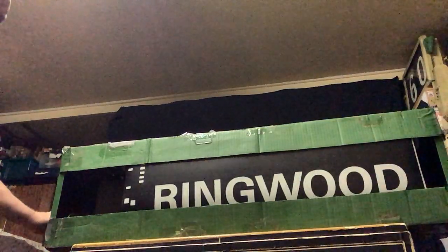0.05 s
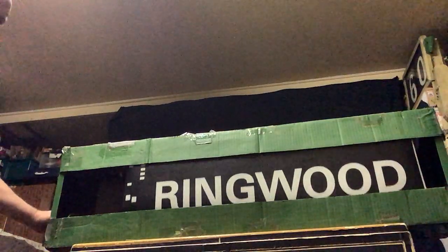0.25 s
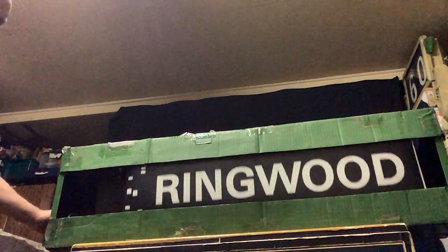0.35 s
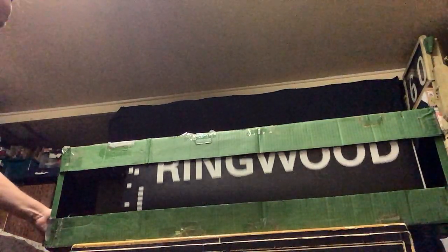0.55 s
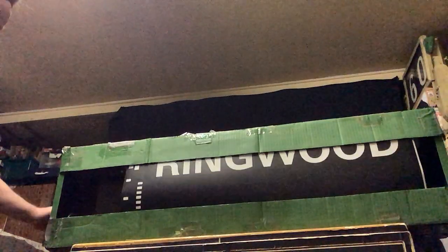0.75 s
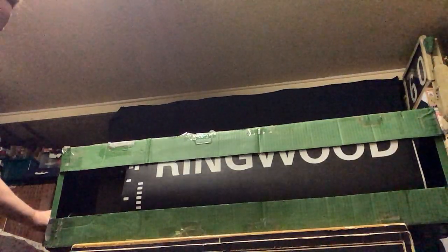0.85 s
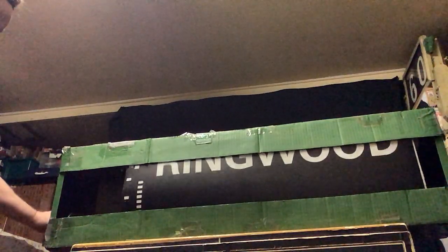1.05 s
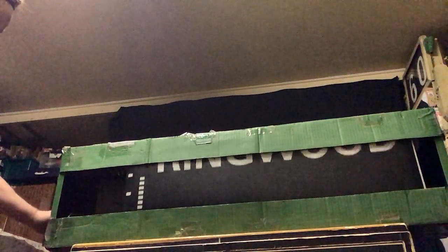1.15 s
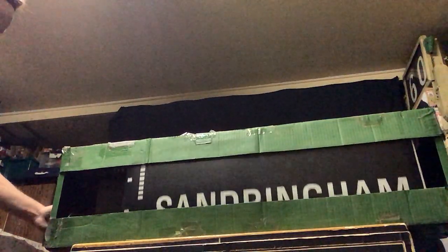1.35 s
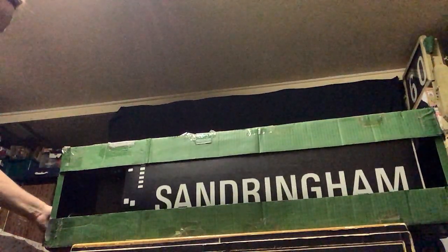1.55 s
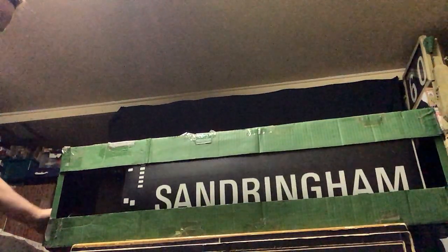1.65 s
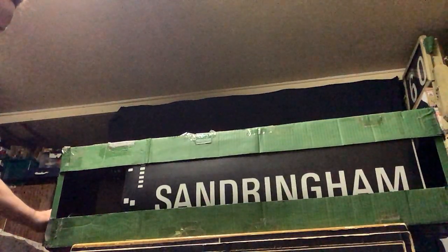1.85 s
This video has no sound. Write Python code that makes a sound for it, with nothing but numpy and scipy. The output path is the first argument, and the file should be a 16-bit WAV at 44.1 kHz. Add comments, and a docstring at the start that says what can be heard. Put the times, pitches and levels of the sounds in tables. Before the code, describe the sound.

A hand-wound roller blind ratchets in two short strokes, with cloth swishing and light knocks.

```python
"""A hand cranks a cloth roller blind in two strokes, in a wooden case in a small quiet room.
First the crank knocks the case lightly and the loose shaft taps. Then the rollers rumble, the cloth
swishes over them, and a pawl (a small catch) clicks over eight teeth of a ratchet wheel. The crank
stops with a knock and a faint metal clink. After a short pause it knocks again, and a second stroke
brings another swish and seven clicks. A last few knocks die away into the room's soft hum of air."""
import sys
import numpy as np
from scipy import signal
from scipy.fft import rfft, irfft
from scipy.io import wavfile

SR = 44100
rng = np.random.default_rng(int(sys.argv[2]) if len(sys.argv) > 2 else 0)


def generate_wav(sig):
    """Save sig (samples, or channels by samples) to the path in sys.argv[1] as 16-bit PCM at SR."""
    pcm = np.round(np.clip(np.atleast_2d(sig).T, -1, 1) * 32767).astype(np.int16)
    wavfile.write(sys.argv[1], SR, pcm)


N = 83790  # length in samples: 1.9 s

# Levels are relative. "Fade" is the time a sound takes to drop by 60 dB.
# Clicks of the pawl: t/s, level/dB, brightness/(dB per octave), extra bite/dB
CLICKS = [(0.2163, -45, 0.5, 1.5), (0.2992, -37.5, 0, 3), (0.3553, -36, 0.5, 1.5), (.405, -35.5, .5, -3.5),
          (0.445, -32.5, -0.5, 5), (0.4818, -35.5, -0.5, 0), (.519, -34.5, -1, -9), (0.5612, -37, -2, 1),
          (1.1108, -41, -2, -1.5), (1.1751, -37, -1, 1), (1.2382, -38.5, -0.5, 1), (1.3015, -37, 1, -1.5),
          (1.3545, -34, 1, 1), (1.4092, -38.5, -0.5, -1.5), (1.478, -39.5, 1.5, -5.5)]
# Ringing tones of the pawl and wheel: f/Hz, level/dB, fade/s
PAWL_TONES = [(1490, -5, .09), (1694, -4, .11), (1790, -7, .12), (1894, -8, .13), (2272, -10, .14),
              (2870, -7, .11), (3052, -11, .13), (3930, -4, .05), (4060, -2, .06), (4568, -4, .08),
              (4710, -4, .08), (4890, -5, .06), (6011, -3, .07), (7563, -8, .07), (7962, -9, .07),
              (8450, -6, .05), (8680, -3, .055), (9930, -7, .06)]
# Noisy clack of the whole mechanism: f/Hz, level/dB
CLACK_SPECTRUM = [(150, -27), (700, -5.5), (1500, 5.5), (3300, -1), (4200, 5.5), (5200, 0.5), (7200, 1),
                  (8600, 5), (9400, -2.5), (11200, -1), (11800, -10.5), (16000, -14)]
# How long the clack lasts: f/Hz, fade/s
CLACK_FADES = [(500, 0.031), (1800, 0.084), (5000, 0.023), (15000, 0.091)]
# Speed of the cloth, given as the loudness of its swish: t/s, level/dB
CLOTH_SPEED = [(0, -77), (.13, -73), (.2, -54), (.245, -48.5), (.33, -46.5), (.42, -43), (.52, -42),
               (.59, -46), (.645, -50), (.7, -54), (.77, -78), (.98, -81.5), (1.03, -59), (1.1, -49.5),
               (1.2, -47.5), (1.33, -46.5), (1.43, -46.5), (1.52, -50), (1.565, -56), (1.61, -74),
               (1.7, -79)]
# Hiss of the rubbing cloth: f/Hz, level/dB
SWISH_SPECTRUM = [(100, -12), (300, -2.5), (800, -2.5), (1800, -0.5), (3500, 1), (5600, -4.5), (8300, -5),
                  (11000, -7.5), (15500, -8.5)]
# Knocks of the crank and roller on the case: t/s, level/dB, brightness/(dB per octave)
KNOCKS = [(0.0612, -56.5, 2), (0.0889, -48.5, 2.5), (0.6527, -38.5, 2.5), (.657, -39, -3.5),
          (0.671, -48, -8), (0.9231, -51, 2), (.9295, -48, 0), (.937, -50, -1.5), (.955, -50.5, -0.5),
          (0.9778, -65, 0), (1.593, -50.5, 3), (1.605, -45, 2.5), (1.63, -44.5, 1), (1.643, -53, -7),
          (1.686, -51.5, 0), (1.711, -57, 5.5), (1.831, -52.5, -1), (1.8365, -51, -1.5)]
# Thud of the wooden case: f/Hz, level/dB
CASE_SPECTRUM = [(40, -24), (100, -24), (190, -9), (300, 4), (500, 1.5), (800, -1.5), (1200, -8),
                 (1550, -7.5), (2000, -13.5), (2800, -14.5), (3600, -26), (4800, -28), (6500, -34),
                 (16000, -54)]
# How long the thud lasts: f/Hz, fade/s
CASE_FADES = [(100, 0.43), (300, 0.085), (1000, 0.11), (5000, 0.11)]
# Ringing tones of the wooden panels: f/Hz, level/dB, fade/s
PANEL_TONES = [(146, 12, 0.34), (264, -1, 0.4), (302.3, 7.5, 0.22), (380, -50, 0.34), (400, -26, 0.15),
               (509.2, -0.5, 0.29), (576, -14, 0.48), (672, -8.5, 0.43)]
# Taps of the loose shaft: t/s, level/dB, f/Hz, spread to each side as a share of f, fade/s
TAPS = [(0.0626, -61.5, 2370, 0.094, 0.077), (0.0883, -59.5, 4215, .2, 0.17),
        (0.6537, -48, 1520, 0.051, 0.015), (.655, -43, 471, 0.19, 0.056), (.6705, -43, 285.6, 0.18, 0.073),
        (0.9782, -52.5, 467, 0.13, 0.018), (1.6047, -47.5, 1560, .09, 0.019),
        (1.629, -57, 2730, 0.18, 0.044), (1.686, -53, 496, .15, 0.058), (1.8365, -53.5, 554, 0.19, 0.036)]
# Clinks of the metal crank: t/s, level/dB, brightness/(dB per octave)
CLINKS = [(.157, -72.5, 18), (.64, -54, -4), (0.654, -45, -9), (0.669, -52, -2), (0.926, -63, 15),
          (0.9388, -55.5, 11), (1.628, -64, -4)]
# Ringing tones of the crank: f/Hz, level/dB, fade/s
CRANK_TONES = [(4334, -8, .1), (5319, -7, .18), (5650, -3, .2), (6350, -8, .13), (7456, -4, .14),
               (9071, -8, .13), (9927, -1, .12), (11000, -7, .09), (13300, -12, .09)]
# Noisy part of a clink: f/Hz, level/dB
CLINK_SPECTRUM = [(2000, -17), (5000, -2), (11000, -12.5), (16000, -22)]
# Loudness of the turning rollers: t/s, level/dB
ROLLER_LEVELS = [(0, -72), (.08, -84), (.11, -56.5), (.3, -65.5), (.44, -60.5), (.55, -51), (.68, -54.5),
                 (.78, -74), (.9, -71), (1.0, -54), (1.12, -76.5), (1.3, -56.5), (1.39, -61.5), (1.45, -56),
                 (1.55, -57.5), (1.66, -61), (1.78, -66.5), (1.9, -76)]
# Rumble of the rollers: f/Hz, level/dB
RUMBLE_SPECTRUM = [(30, -40), (48, -14), (75, -4), (98, 2), (130, -5), (160, -4), (200, -9), (290, -5),
                   (500, -15), (1200, -35), (4000, -65)]
# Steady air noise in the room: f/Hz, level/dB
AIR_SPECTRUM = [(25, -33), (50, -4.5), (100, -7), (180, -18), (300, -0.5), (700, -6.5), (1500, -15),
                (3000, -34.5), (6000, -26), (16000, -28.5)]
# How long the room echoes: f/Hz, fade/s
ROOM_FADES = [(100, 0.18), (500, 0.27), (2000, 0.21), (6000, 0.22), (15000, 0.28)]


def ratchet():
    """The pawl drops off each tooth and rings the mechanism, with more bite when it lands squarely."""
    out = np.zeros(N)
    shared_clack = noisy_ring(CLACK_SPECTRUM, CLACK_FADES, hold_s=.0015)
    bite_hz, bite_width_hz = 4180, 2300
    bite_filter = signal.iirpeak(bite_hz, bite_hz / bite_width_hz, SR)
    for start, db, brightness, bite_db in CLICKS:
        tooth_clack = noisy_ring(CLACK_SPECTRUM, CLACK_FADES, hold_s=.0015)  # each tooth differs
        click = scale_hit(shared_clack + .8 * tooth_clack)
        click += gain(-4.5) * ring(PAWL_TONES, scatter_db=1)
        click += (gain(bite_db) - 1) * signal.lfilter(*bite_filter, click)
        add(out, start, gain(db) * brighten(click, brightness, low_hz=870, high_hz=7800))
    return in_room(out, echo_db=-5)


def cloth():
    """The weave rubs over the rollers in tiny catches, louder and brighter the faster it moves."""
    grains_per_s, grain_share = 3000, .25
    grains = scale_steady(rng.standard_normal(N) * (rng.random(N) < grains_per_s / SR))
    rub = np.sqrt(grain_share) * grains + np.sqrt(1 - grain_share) * rng.standard_normal(N)
    rub = scale_steady(colour(rub, SWISH_SPECTRUM))
    hz, t, slices = signal.stft(rub, SR, nperseg=256, noverlap=192)  # the spectrum moment by moment
    speed_db = curve(CLOTH_SPEED, t)
    full_speed_db, dulling = -38.5, .23  # dulling: dB per octave lost for each dB below full speed
    brightness = dulling * np.clip(speed_db - full_speed_db, -20, 0)
    octaves = np.log2(np.maximum(hz, 1500) / 3000)[:, None]
    slices *= gain(speed_db + brightness * octaves)
    swish = signal.istft(slices, SR, nperseg=256, noverlap=192)[1][:N]
    return in_room(gain(-1.5) * swish, echo_db=-13)


def wooden_case():
    """Dull knocks of the crank and roller set the wooden panels ringing."""
    out, t = np.zeros(N), np.arange(SR // 2) / SR
    contact_s = .00097
    soft_start = 1 - np.exp(-(t / contact_s) ** 2)
    for start, db, brightness in KNOCKS:
        knock = noisy_ring(CASE_SPECTRUM, CASE_FADES) + gain(-7) * ring(PANEL_TONES, scatter_db=1)
        knock = brighten(knock, brightness, low_hz=230, high_hz=2800)
        add(out, start, gain(db) * soft_start * knock)
    return in_room(out, echo_db=-8)


def shaft():
    """The loose shaft shifts in its bearings with short, pitched taps."""
    out = np.zeros(N)
    for start, db, hz, spread, fade_s in TAPS:
        tones = split_tones([(hz, 0, fade_s)], spread, count=13)
        add(out, start, gain(db) * ring(tones, scatter_db=2))
    return in_room(out, echo_db=-5)


def crank():
    """Loose metal parts clink as the crank starts and stops."""
    out = np.zeros(N)
    for start, db, brightness in CLINKS:
        clink = noisy_ring(CLINK_SPECTRUM, fades=[(8000, .12)])
        clink += ring(split_tones(CRANK_TONES, spread=.018, count=7), scatter_db=1.5)
        add(out, start, gain(db) * brighten(clink, brightness, low_hz=4300, high_hz=12500))
    return in_room(out, echo_db=-11.5)


def rollers():
    """The turning rollers rumble through the case."""
    rumble = scale_steady(colour(rng.standard_normal(N), RUMBLE_SPECTRUM))
    return gain(curve(ROLLER_LEVELS, np.arange(N) / SR)) * rumble


def in_room(x, echo_db):
    """The walls of the small room send a sound back as a short, blurred echo."""
    echo = np.zeros(SR // 2)
    add(echo, start_s=.005, sound=noisy_ring([(20, 0), (SR / 2, 0)], ROOM_FADES))
    return x + gain(echo_db) * signal.fftconvolve(x, echo / np.linalg.norm(echo))[:N]


def room_air():
    """The air of the room makes a faint, steady noise."""
    return gain(-70) * scale_steady(colour(rng.standard_normal(N), AIR_SPECTRUM))


def ring(tones, scatter_db):
    """A struck part rings with its own tones, their levels a little different at each hit."""
    out, t = np.zeros(SR // 2), np.arange(SR // 2) / SR
    for hz, db, fade_s in tones:
        strength = gain(db + scatter_db * rng.standard_normal())
        swell = 1 - np.exp(-(2 * hz * t) ** 2)  # rises within one cycle
        wave = np.sin(2 * np.pi * (hz * t + rng.random()))
        out += strength * swell * gain(-60 * t / fade_s) * wave
    return scale_hit(out)


def noisy_ring(spectrum, fades, hold_s=0):
    """Countless tones blur into noise; each band holds for hold_s, then fades at its own speed."""
    out, t = np.zeros(SR // 2), np.arange(SR // 2) / SR
    hz = np.fft.rfftfreq(len(t), 1 / SR)
    noise_spectrum = rfft(colour(rng.choice([-1., 1.], len(t)), spectrum))
    centres_hz, fade_times = np.transpose(fades)
    for one_band, fade_s in zip(np.eye(len(fades)), fade_times):
        band = irfft(noise_spectrum * at_pitch(np.c_[centres_hz, one_band], hz), len(t))
        out += band * gain(-60 * np.maximum(t - hold_s, 0) / fade_s)
    return scale_hit(out)


def split_tones(tones, spread, count):
    """Splits each tone into several close ones that waver against each other."""
    return [(hz * (1 + spread * offset), db, fade_s)
            for hz, db, fade_s in tones
            for offset in np.linspace(-1, 1, count) + rng.uniform(-1.13, 1, count) / count]


def brighten(x, db_per_octave, low_hz, high_hz):
    """Tilts a hit's spectrum between two frequencies: plus is brighter, minus is duller."""
    padded = 2 * len(x)
    hz = np.clip(np.fft.rfftfreq(padded, 1 / SR), low_hz, high_hz)
    tilt = gain(db_per_octave * np.log2(hz / low_hz))
    return scale_hit(irfft(rfft(x, padded) * tilt)[:len(x)])


def colour(x, spectrum):
    """Makes each frequency of a sound as strong as a table says."""
    hz = np.fft.rfftfreq(len(x), 1 / SR)
    return irfft(rfft(x) * gain(at_pitch(spectrum, hz)), len(x))


def at_pitch(table, hz):
    """Reads between the rows of a frequency table, with octaves evenly spaced."""
    table_hz, values = np.transpose(table)
    return np.interp(np.log(hz + 1), np.log(table_hz + 1), values)


def curve(table, t):
    """Reads between the rows of a time table."""
    return np.interp(t, *np.transpose(table))


def gain(db):
    """Turns decibels into a number to multiply by."""
    return 10 ** (np.asarray(db) / 20)


def scale_steady(x):
    """Scales a sound to an average power of 1."""
    return x / np.sqrt(np.mean(x ** 2) + 1e-20)


def scale_hit(x):
    """Scales a hit to the energy of 10 ms at power 1."""
    return x / np.sqrt(np.sum(x ** 2) / (.01 * SR) + 1e-20)


def add(mix, start_s, sound):
    """Mixes a sound in at its start time."""
    part = mix[round(start_s * SR):][:len(sound)]
    part += sound[:len(part)]


def scene():
    """All parts of the blind over the quiet air of the room, in one channel."""
    air = room_air()
    return (ratchet() + wooden_case() + shaft() + crank() + cloth() + rollers() + air)[None]


def record(dry):
    """Trims away the deepest rumble and the highest hiss."""
    low_hz, high_hz = 52, 15800
    low_cut = signal.butter(4, low_hz, "high", fs=SR, output="sos")
    high_cut = signal.firwin(511, high_hz, window=("kaiser", 9), fs=SR)
    return signal.oaconvolve(signal.sosfilt(low_cut, dry), high_cut[None], "same")


dry = scene()
out = record(dry)
generate_wav(out)
```